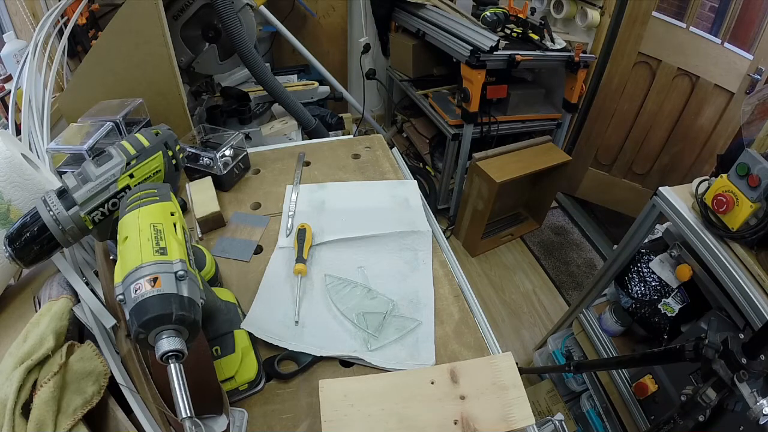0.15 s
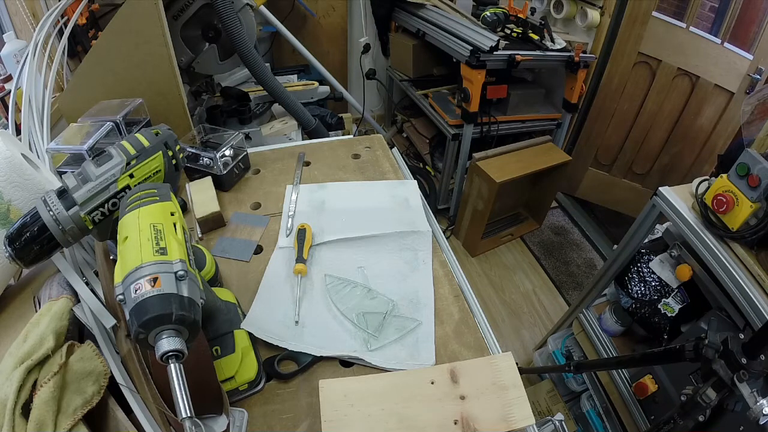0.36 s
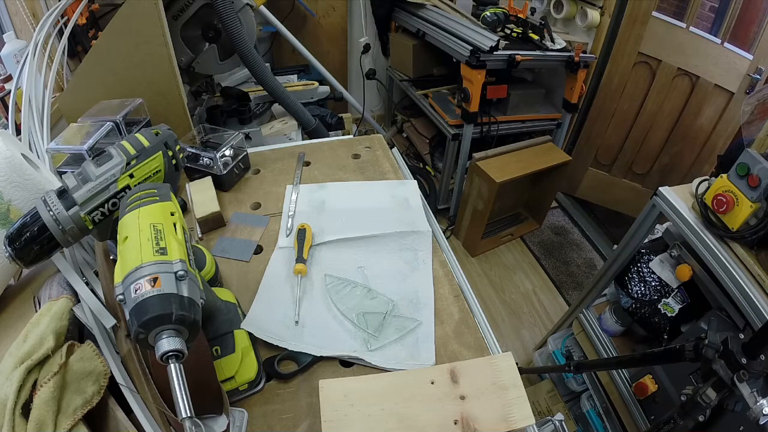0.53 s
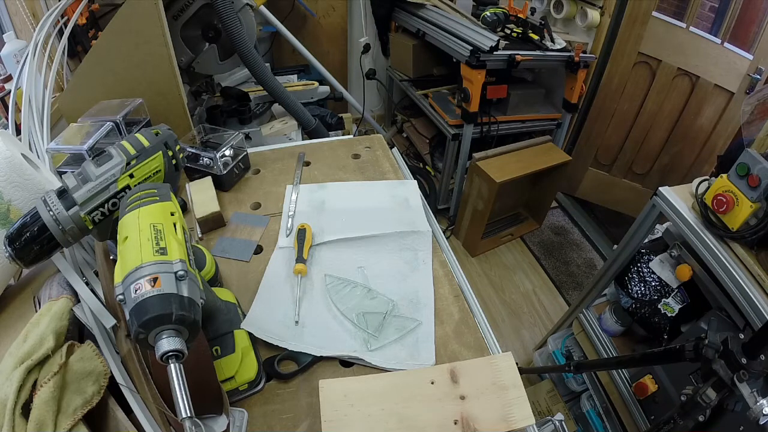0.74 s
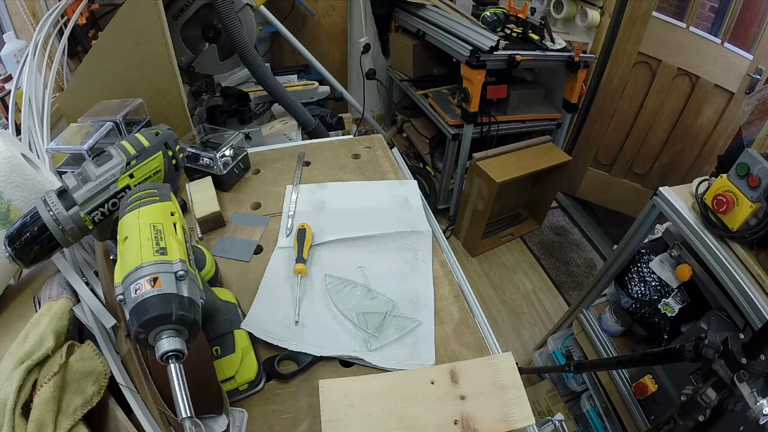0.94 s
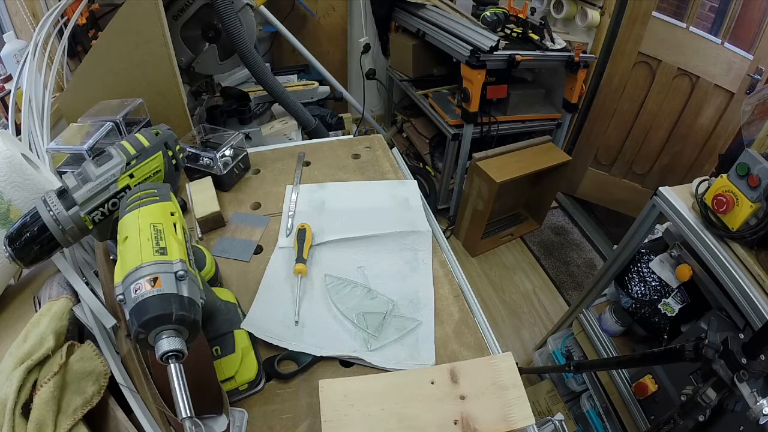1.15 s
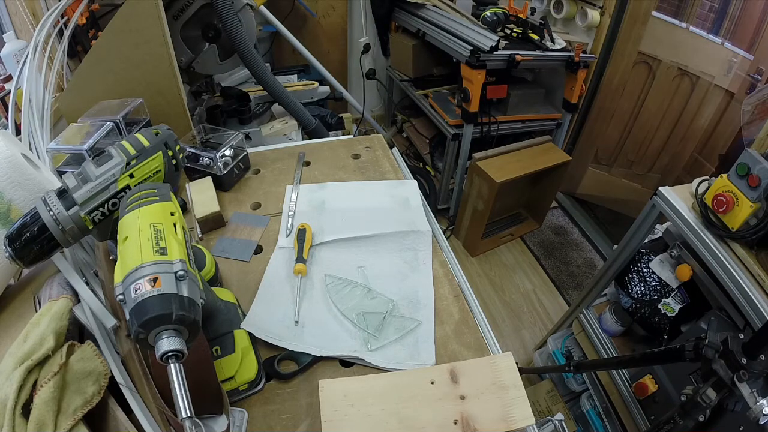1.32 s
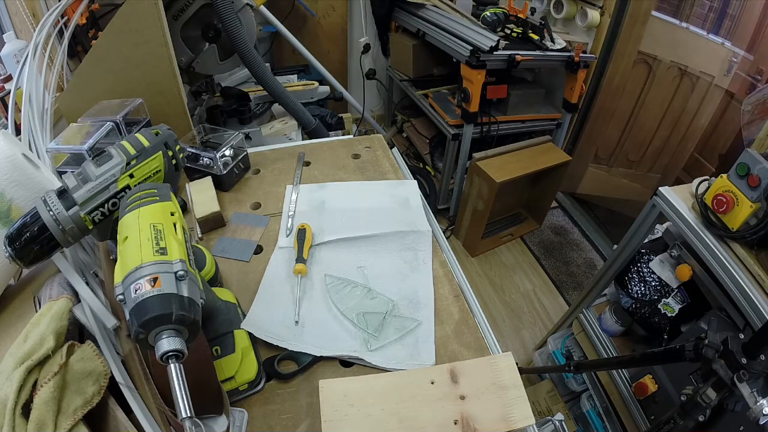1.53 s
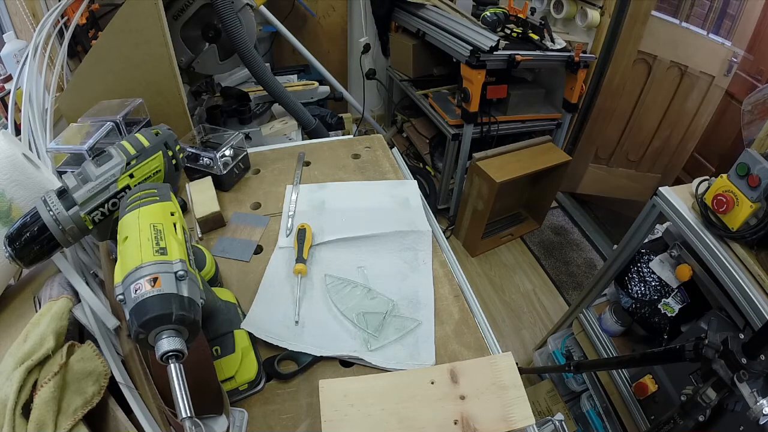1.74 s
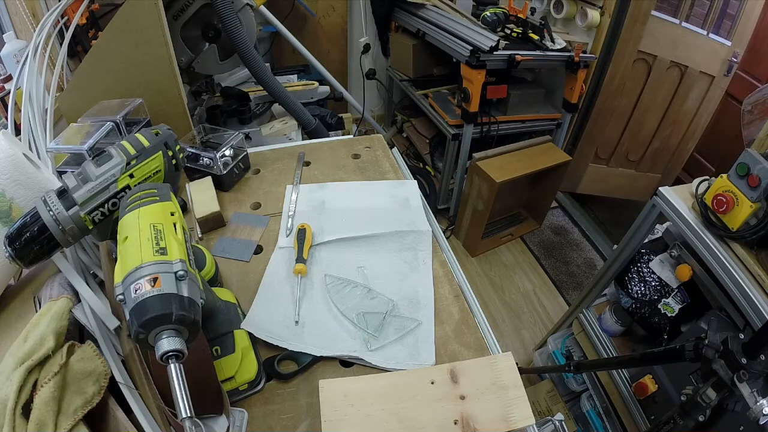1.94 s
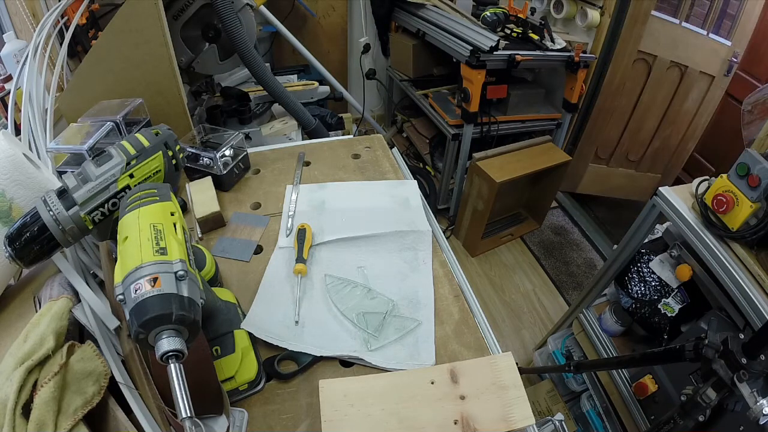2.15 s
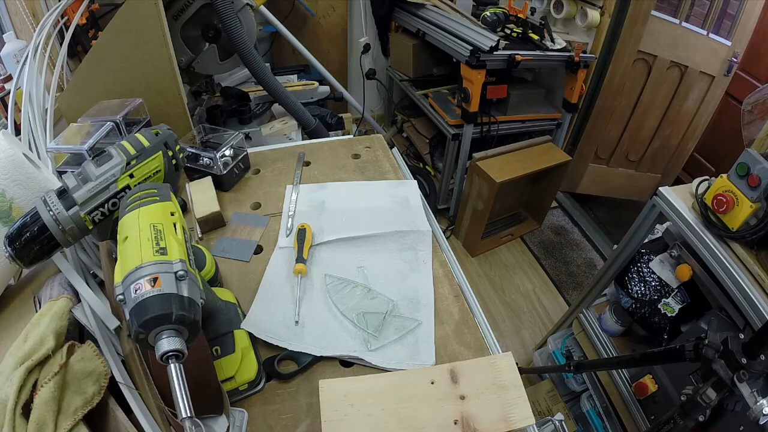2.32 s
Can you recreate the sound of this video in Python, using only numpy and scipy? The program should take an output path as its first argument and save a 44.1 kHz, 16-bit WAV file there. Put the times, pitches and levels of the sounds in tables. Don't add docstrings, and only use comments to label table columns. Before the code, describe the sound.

In a cluttered workshop, a metal-framed pane takes four violent close blows with short ringing, bench thumps and rattling echoes, flattened by the microphone; suddenly quiet, hands rub paper and fragments while a tool knocks the bench.

```python
import sys
import numpy as np
from scipy import signal
from scipy.io import wavfile

SR = 44100
rng = np.random.default_rng(int(sys.argv[2]) if len(sys.argv) > 2 else 0)


def gain_from_db(level_db):
    decades = np.asarray(level_db, float) / 20
    return 10 ** decades


def generate_wav(sig):
    pcm = np.round(np.clip(np.atleast_2d(sig).T, -1, 1) * 32767).astype(np.int16)
    wavfile.write(sys.argv[1], SR, pcm)


N = 110250
T = np.arange(N) / SR
EDGES = 24 * 2 ** np.arange(0, 9.7, .5)

# (time [s], rattle and echo [dB], their brightness [dB per octave], bench boom [dB], boom pitch
# [Hz])
BLOWS = [
    (0.2042, 0, 1.68, -18, 108),
    (0.6234, -1, 1, -12.5, 184),
    (1.0277, 2, 0.9, -15.5, 126),
    (1.4091, -2, 1.72, -9.5, 186),
]
# (centre [Hz], level [dB], length [s], crunch after it [dB], crunch t60 [s])
CRACKS = [
    (2190, -4.5, 0.023, -14, 0.32),
    (3900, -2.5, 0.017, -11.5, 0.23),
    (2830, -1.6, 0.012, -23, .2),
    (2480, -5, 0.012, -24, 0.16),
]
CRACKS_PER_S, CRACK_DB = 9000, 12
PUSH_LEAD_S, PUSH_DB, PUSH_HZ, PUSH_T60_S = .0022, -11, 550, .012
BOOM_DELAY_S, BOOM_RISE_S, BOOM_T60_S = 0.0082, 0.01, 0.19

# (pitch [Hz], level [dB], t60 [s])
FRAME = [(220, -20, 0.088), (534, -17, 0.052), (656, -23.5, 0.087), (747, -8.5, 0.07), (844, -21, 0.079),
         (1022, -4.5, 0.062), (1154, -6.5, 0.1), (1263, -20, 0.22), (1754, -17, 0.047), (2008, -8.5, 0.057),
         (2298, -20, 0.081), (2408, -5, 0.089), (2716, -14, 0.11), (3193, -22.5, 0.095)]
# (ring level [dB], favoured pitch [Hz], favour [dB])
LANDING = [
    (1.9, 870, 2),
    (2.3, 780, 8.5),
    (0, 490, 10),
    (-3, 640, 16),
]
RING_DB, RING_RISE_S, FAVOUR_OCTAVES = 4, 0.0049, 0.43

# (time [s], level [dB], pitch [Hz], sag [Hz per s], t60 [s])
PANE = [
    (0.2147, 7.5, 349.2, 101, 0.1),
    (0.637, 9, 354, 1200, 0.039),
    (1.043, 7, 349, 150, 0.087),
    (1.064, 3.5, 337, 100, 0.054),
    (1.415, -0.5, 229.6, 49.6, 0.072),
    (1.427, 10.5, 315, 198, 0.042),
]
PANE_RISE_S, PANE_PAIR, PANE_PAIR_SHARE = 0.0038, 0.98, 0.8

# (time [s], peak [dB])
BOUNCES = [
    (.002, -24),
    (.327, -20.5),
    (0.756, -29),
    (0.858, -36.5),
    (.938, -41.5),
    (1.189, -27),
    (1.221, -28),
    (1.365, -52),
]
BOUNCE_SOFT_HZ, BOUNCE_TILT_DB = 1200, -2

# (frequency [Hz], level [dB per Hz])
SCATTER = [(24, -48), (40, -28.5), (200, -11), (345, -10), (620, -15), (1300, -15.5), (4240, -27.5),
           (17000, -48)]
# (frequency [Hz], t60 [s])
SCATTER_T60 = [(60, 0.49), (160, 0.29), (420, 0.14), (1100, 0.11), (2900, 0.12), (7700, 0.1),
               (15000, 0.069)]
SCATTER_DB, RATTLE_LAG_S, RATTLE_DB = 1.5, 0.023, -11
LATE_DB, LATE_STRETCH = -25.5, 3.35

# (time [s], peak [dB], pitch [Hz], clatter [dB], t60 [s])
KNOCKS = [
    (1.992, -27, 1122, -31.5, 0.039),
    (2.13, -11, 451, -23.5, 0.11),
    (2.151, -30, 437, -33.5, .08),
    (2.199, -25.5, 409, -43, 0.12),
    (2.276, -32, 312, -40, 0.032),
    (2.293, -20, 450, -21.5, 0.15),
    (2.31, -35, 300, -37, 0.092),
    (2.345, -40, 670, -46, 0.085),
]
# (multiple of its pitch, level [dB])
BENCH = [(.5, -7), (.76, -10), (1.0, 4.3), (2.2, -6), (3.1, -18), (4.5, -30)]
# (frequency [Hz], level [dB per Hz])
CLATTER = [(100, -36), (170, -6.5), (459, -0.5), (608, -12), (1440, -10), (1770, -14), (15000, -48.5)]

# (time [s], peak [dB], pitch [Hz], t60 of the rough contact [s])
SHARDS = [
    (1.366, -39, 2440, 0.12),
    (1.722, -38.5, 6230, 0.15),
    (1.924, -45, 6260, 0.18),
    (2.348, -34, 2120, .05),
]

# (middle [s], half length [s], level [dB], brightness [dB per octave])
STROKES = [(.96, 0.016, -51.5, -8.5), (1.376, 0.025, -49.5, -5), (1.541, 0.024, -38.5, 1.5),
           (1.604, 0.038, -38, 0.5), (1.671, .03, -48, -0.5), (1.725, .02, -54, 3),
           (1.818, 0.022, -59.5, 6), (1.887, 0.028, -47.5, -2), (1.935, 0.028, -54, 0.5),
           (2.008, 0.015, -45, -3.5), (2.041, 0.029, -50, -6.5), (2.143, 0.0098, -39, 0.5),
           (2.192, 0.075, -51.5, 0.5), (2.303, 0.019, -37, -8), (2.35, 0.012, -39.5, -4.5),
           (2.396, 0.033, -38.5, -5), (2.445, 0.014, -42, -2), (2.474, .02, -50.5, -2)]
# (frequency [Hz], level [dB per Hz])
RUSTLE = [(290, -6), (500, -11), (949, -2), (1750, -4), (2680, 1.5), (13600, -8.5), (15000, -11)]
GRAINS_PER_S, GRAIN_SHARE = 1600, 0.31

# (frequency [Hz], level [dB per Hz])
AIR = [(13, -48), (22, 3.5), (100, -0.5), (286, -9.5), (910, -10.5), (1100, -12), (6100, -30.5),
       (13900, -46.5), (16000, -55)]
AIR_DB, AIR_AFTER_DB = -42.5, 1.42

CHANGE_S, FADE_OUT_S, FADE_IN_S = 1.515, 0.01, 0.005
QUIET_TOP_HZ = 15500
CEILING, KNEE = 1.0, 6
BASS_CUT_HZ, CUTOFF_HZ = 10, 16200


def rms_one(x):
    return x / np.sqrt(np.mean(x ** 2) + 1e-20)


def at_hz(points, hz):
    table_hz, value = np.array(points).T
    return np.interp(np.log(hz), np.log(table_hz), value)


def band_pass(x, low_hz, high_hz):
    return signal.sosfilt(signal.butter(2, [low_hz, high_hz], "band", fs=SR, output="sos"), x)


def low_pass(x, hz, order):
    return signal.sosfilt(signal.butter(order, hz, fs=SR, output="sos"), x)


def steep_top(x, order, stop_db, hz):
    return signal.sosfilt(signal.cheby2(order, stop_db, hz, fs=SR, output="sos"), x)


def ring(drive, hz, t60):
    shrink = gain_from_db(-60 / (t60 * SR))
    turn = 2 * np.pi * hz / SR
    return signal.lfilter([0, np.sin(turn)], [1, -2 * shrink * np.cos(turn), shrink ** 2], drive + 1e-18)


def dying(start, t60, rise):
    out, first = np.zeros(N), int(start * SR)
    u = np.arange(min(N - first, int(1.5 * t60 * SR))) / SR
    out[first:first + len(u)] = (1 - np.exp(-u / rise)) * np.exp(-np.log(1000) * u / t60)
    return out


def click(s, db):
    x = np.zeros(N)
    x[int(s * SR)] = gain_from_db(db)
    return x


def grains(rate):
    happens = rng.random(N) < rate / SR
    size = gain_from_db(3 * np.minimum(rng.exponential(1, N), 4))
    return rms_one(happens * size * rng.choice([-1, 1], N))


def banded(spectrum, envelope, white=None):
    if white is None:
        white = rng.standard_normal((2, N))
    centres = np.sqrt(EDGES[1:] * EDGES[:-1])
    outside = (centres < spectrum[0][0]) | (centres > 2e4)
    gain = gain_from_db(at_hz(spectrum, centres) - 80 * outside)
    gain = gain / np.sqrt(np.sum(gain ** 2 * np.diff(EDGES)) * 2 / SR)
    out = np.zeros(N)
    for k, hz in enumerate(centres):
        noise = white[k % 2]
        out += gain[k] * envelope(hz) * band_pass(noise, EDGES[k], EDGES[k + 1])
    return out


def cracks():
    contacts, out = grains(CRACKS_PER_S), np.zeros(N)
    for (s, *_), (hz, db, length, crunch_db, t60) in zip(BLOWS, CRACKS):
        burst = (T >= s) * np.exp(-(np.maximum(T - s, 0) / length) ** 2)
        crunch = gain_from_db(crunch_db) * dying(s, t60, 0.0054)
        out += gain_from_db(CRACK_DB + db) * band_pass(contacts * (burst + crunch), hz * 0.76, hz * 1.277)
    return out


def frame():
    out = np.zeros(N)
    for (s, *_), (ring_db, best_hz, favour_db) in zip(BLOWS, LANDING):
        for hz, mode_db, t60 in FRAME:
            phase, detune = rng.random(2)
            octaves_off = np.log2(hz / best_hz)
            db = RING_DB + ring_db + mode_db + favour_db * np.exp(-(octaves_off / FAVOUR_OCTAVES) ** 2)
            tuned_hz = hz * (1 + .012 * (detune - .5))
            out += gain_from_db(db) * dying(s, t60, RING_RISE_S) * np.sin(2 * np.pi * (tuned_hz * T + phase))
    return out


def pane():
    out = np.zeros(N)
    for s, db, hz, sag, t60 in PANE:
        u = np.clip(T - s, 0, .3)
        turn = 2 * np.pi * (hz * u - .5 * sag * u ** 2)
        pair = np.sin(turn) + PANE_PAIR_SHARE * np.sin(turn * PANE_PAIR)
        out += gain_from_db(db) * dying(s, t60, PANE_RISE_S) * pair
    return out


def bench_thumps():
    shake, out = rng.standard_normal(N), np.zeros(N)
    for s, _, _, boom_db, hz in BLOWS:
        out -= ring(click(s - PUSH_LEAD_S, PUSH_DB), PUSH_HZ, PUSH_T60_S)
        boom = rms_one(band_pass(shake, hz * 0.79, hz * 2.0))
        out += gain_from_db(boom_db + 8) * boom * dying(s + BOOM_DELAY_S, BOOM_T60_S, BOOM_RISE_S)
    return out


def bounces():
    out = np.zeros(N)
    for s, db in BOUNCES:
        soft = low_pass(click(s, db), BOUNCE_SOFT_HZ, 2)
        for share, hz, t60 in [(1, 344.4, 0.087), (0.3, 735, 0.13), (0.3, 1003, 0.13), (0.17, 500, 0.092)]:
            out += share * ring(soft, hz, t60)
    return out


def scatter():
    def envelope(hz):
        t60, rise = at_hz(SCATTER_T60, hz), 0.0029 + 1.74 / hz
        octaves = np.log2(hz / 1000)
        hits = [(s, db + tilt * octaves) for s, db, tilt, _, _ in BLOWS]
        rattles = [(s + RATTLE_LAG_S, db + RATTLE_DB) for s, db in hits]
        landings = [(s, db - 10.5 + BOUNCE_TILT_DB * octaves) for s, db in BOUNCES]
        out = np.zeros(N)
        for s, db in hits + rattles + landings:
            late = gain_from_db(LATE_DB) * dying(s, t60 * LATE_STRETCH, rise)
            out += gain_from_db(db) * (dying(s, t60, rise) + late)
        return out
    return gain_from_db(SCATTER_DB) * banded(SCATTER, envelope)


def knocks():
    out, clatter = np.zeros(N), np.zeros(N)
    rough = rng.standard_normal(N)
    for s, db, hz, clatter_db, t60 in KNOCKS:
        contact = click(s, db - 13.5) + gain_from_db(db - 27) * rough * dying(s, 0.022, 0.0012)
        for multiple, part_db in BENCH:
            out += gain_from_db(part_db) * ring(contact, hz * multiple, t60 / multiple ** 0.75)
        clatter += gain_from_db(clatter_db) * dying(s, t60, 0.0029)
    return out + banded(CLATTER, lambda hz: clatter)


def shards():
    rough, out = rng.standard_normal(N), np.zeros(N)
    for s, db, hz, t60 in SHARDS:
        contact = click(s, db) + gain_from_db(db - 22) * rough * dying(s, t60, 0.0012)
        out += ring(contact, hz, 0.011) + 0.5 * ring(contact, hz * 1.04, .02)
    return out


def shuffle():
    middle, half, db, tilt = np.transpose(STROKES)
    coarse = T[::50]
    bells = np.exp(-((coarse - middle[:, None]) / half[:, None]) ** 2)
    hiss = np.sqrt(1 - GRAIN_SHARE) * rng.standard_normal((2, N))
    rubbing = hiss + np.sqrt(GRAIN_SHARE) * grains(GRAINS_PER_S)

    def envelope(hz):
        return np.interp(T, coarse, gain_from_db(db + tilt * np.log2(hz / 5000)) @ bells)
    return banded(RUSTLE, envelope, rubbing)


def room_air():
    return gain_from_db(AIR_DB) * banded(AIR, lambda hz: 1)


def scene():
    before = np.clip((CHANGE_S - T) / FADE_OUT_S, 0, 1)
    after = np.clip((T - CHANGE_S) / FADE_IN_S, 0, 1)
    air = room_air() + shuffle()
    quiet = before * air + shards() + after * (knocks() + gain_from_db(AIR_AFTER_DB) * air)
    quiet = steep_top(quiet, 12, 40, QUIET_TOP_HZ)
    loud = cracks() + frame() + pane() + bench_thumps() + bounces() + scatter()
    return (before * loud + quiet)[None]


def band_limit(x):
    return signal.sosfilt(signal.butter(12, 16190, fs=SR, output="sos"), x)


def record(dry):
    flat = dry / (1 + np.abs(dry / CEILING) ** KNEE) ** (1 / KNEE)
    flat = flat - .5 * low_pass(flat, BASS_CUT_HZ, 1)
    mix = steep_top(flat, 10, 45, CUTOFF_HZ)
    return band_limit(mix)


dry = scene()
out = record(dry)
generate_wav(out)
```